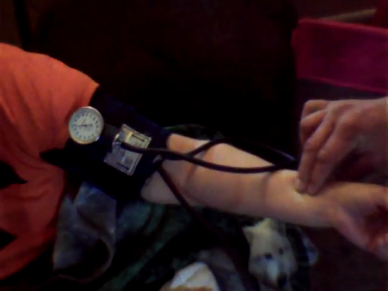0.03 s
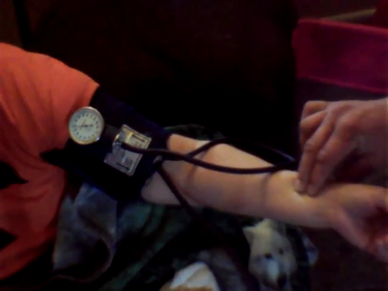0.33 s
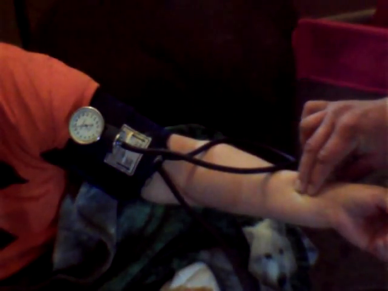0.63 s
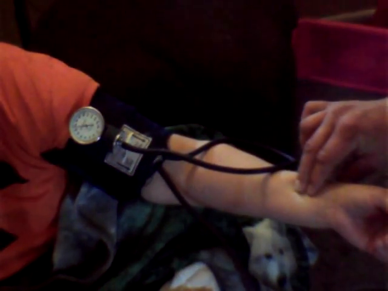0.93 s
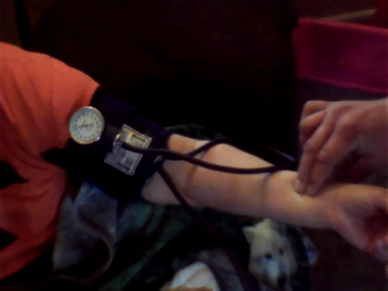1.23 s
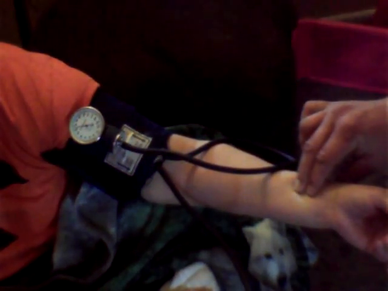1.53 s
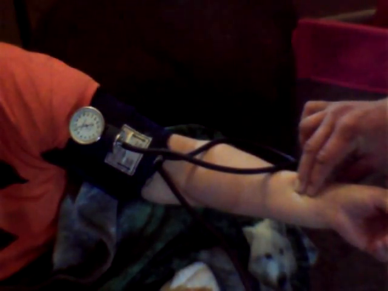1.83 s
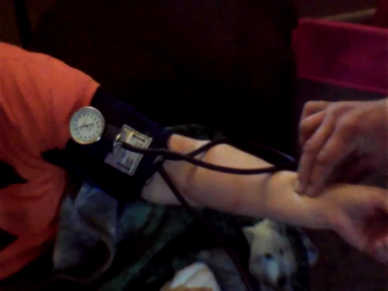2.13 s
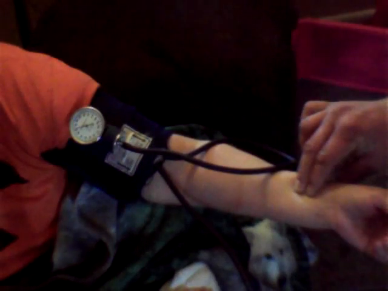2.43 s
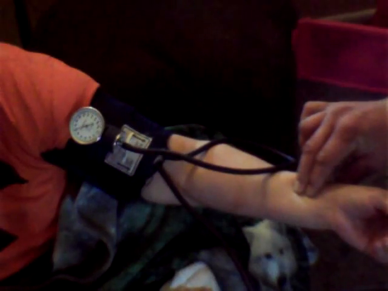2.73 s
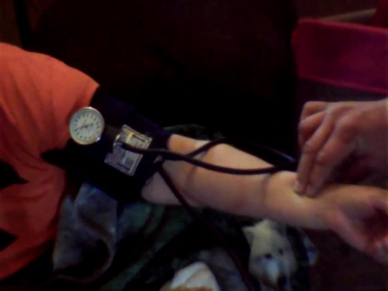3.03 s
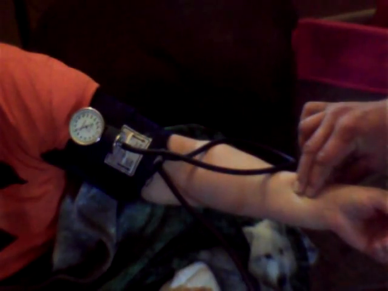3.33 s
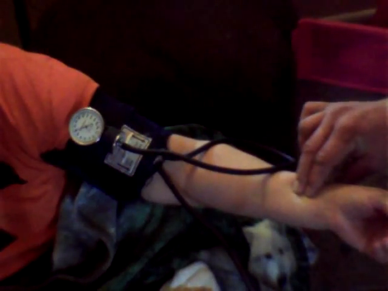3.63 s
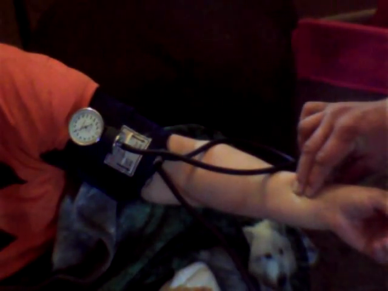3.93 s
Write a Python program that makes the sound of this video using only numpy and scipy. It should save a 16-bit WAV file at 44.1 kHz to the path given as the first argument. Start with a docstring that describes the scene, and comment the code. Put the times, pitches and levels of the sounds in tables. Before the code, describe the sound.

A loud electrical buzz runs without change, carrying a thin, high, fluttering whine. Steady hiss and a faint low hum lie underneath. It is interference inside a small camera, with no sound from the room itself.

```python
"""A still room, with nothing at the microphone: all that is heard arises in a small camera's sound circuit.
A load switches on and off about 58 times a second, and each switching edge ticks, making a buzz.
While the load is on, a thin whine and extra hiss get through.
Mains hum and steady amplifier hiss lie underneath."""
import sys
import numpy as np
from scipy import signal
from scipy.fft import rfft, irfft
from scipy.io import wavfile

SR = 44100
rng = np.random.default_rng(int(sys.argv[2]) if len(sys.argv) > 2 else 0)


def unload_wav(signal):
    """Save mono or channel-first audio to the path in sys.argv[1] as 16-bit WAV at rate SR, clipped to [-1, 1]."""
    wavfile.write(
        sys.argv[1],
        SR,
        np.round(np.clip(np.atleast_2d(signal).T, -1, 1) * 32767).astype(np.int16),
    )


N = 176400

CYCLE_HZ, FIRST_ON_S, ON_S = 57.555, .0155, .0109   # the load: rate, first switch-on, time on


def switching_buzz(cycle, since_on):
    """Each switching edge ticks: a sharp spike and a rounded recoil, their polarity flipping every cycle."""
    # Each row: ms after switch-on, spike height, nominal spike width in ms, relative recoil height.
    edges = [(0, -.046, .075, .029), (10.92, .092, .058, -.028), (14.04, -.102, .08, .057)]
    jitter_ms, scatter_db = .013, 1
    recoil_ms, recoil_db = .44, -1.5
    ticks = np.zeros(N)
    for at_ms, spike, width_ms, recoil in edges:
        late, spike_draw, recoil_draw = rng.standard_normal((cycle[-1] + 1, 3))[cycle].T
        ms = since_on * 1000 - at_ms + jitter_ms * late
        pulse = np.exp(-.5 * (ms / (.94 * width_ms)) ** 2)
        ticks += spike * from_db(scatter_db * spike_draw) * pulse
        age = np.maximum(ms, 0) / recoil_ms
        swing_back = (age * np.exp(1 - age)) ** 2.9
        ticks += recoil * from_db(recoil_db + scatter_db * recoil_draw) * swing_back
    return ticks * (-1) ** cycle


def whine(cycle, since_on):
    """A high tone restarts with every burst; the converter mirrors it and folds its overtones down."""
    whine_hz, converter_hz = 7320, 16000
    whine_db, image_db = -25.5, (-24.5, -49, -48.5)   # images of harmonics 1, 2 and 3
    # Every other burst starts a little short of opposite phase.
    start_turns = .38 * (cycle % 2) + .027 * rng.standard_normal(cycle[-1] + 1)[cycle]
    phase = 2 * np.pi * (whine_hz * since_on + start_turns)
    clock = 2 * np.pi * converter_hz * np.arange(N) / SR
    images = sum(from_db(db) * np.sin(clock - k * phase) for k, db in enumerate(image_db, 1))
    return np.sqrt(2) * (from_db(whine_db) * np.sin(phase) + images)


def load_bursts(cycle, since_on):
    """Whine and extra hiss get through only while the load is on."""
    # Each row: frequency in Hz, hiss density in dB per Hz ahead of the converter.
    burst_hiss = [(30, -88), (500, -80), (2000, -79), (5000, -80), (8000, -78.5)]
    ramp_s = .0001
    load_on = np.clip(np.minimum(since_on, ON_S - since_on) / ramp_s + .5, 0, 1)
    return load_on * (whine(cycle, since_on) + shaped_noise(burst_hiss))


def mains_hum():
    """Odd multiples of the mains, which beat slowly against the buzz."""
    # Each entry: a multiple of the mains frequency.
    orders = (1, 5, 9, 13, 15, 21, 25)
    # Each entry: the level of that multiple in dB.
    levels_db = [-58, -59.5, -51.5, -57, -60, -57.5, -71.5]
    mains_hz = 60
    t = np.arange(N) / SR
    return np.sqrt(2) * sum(from_db(db) * np.sin(2 * np.pi * (k * mains_hz * t + rng.random()))
                            for k, db in zip(orders, levels_db))


def amplifier_hiss():
    """The amplifier's steady noise floor."""
    # Each row: frequency in Hz, density in dB per Hz ahead of the converter.
    noise_floor = [(30, -76), (120, -80), (300, -76.5), (550, -76), (1000, -77.5), (2000, -80.5),
                   (4000, -80.5), (8000, -82)]
    return shaped_noise(noise_floor)


def load_cycles(lead_s):
    """Each sample's cycle number and seconds since switch-on; a cycle opens lead_s before switch-on."""
    t = np.arange(N) / SR - FIRST_ON_S + 2 / CYCLE_HZ
    cycle = np.floor((t + lead_s) * CYCLE_HZ).astype(int)
    return cycle, t - cycle / CYCLE_HZ


def shaped_noise(spectrum):
    """Steady noise whose density follows the given points of Hz and dB per Hz."""
    hz, db = np.transpose(spectrum)
    density_db = np.interp(np.log(np.fft.rfftfreq(N, 1 / SR) + 1), np.log(hz), db)
    return irfft(rfft(rng.standard_normal(N)) * from_db(density_db), N) * np.sqrt(SR / 2)


def from_db(db):
    """Decibels to gain."""
    return 10 ** (np.asarray(db) / 20)


def scene():
    """Buzz and bursts in front, hum and hiss behind, in mono."""
    cycle, since_on = load_cycles(lead_s=.0006)   # the lead keeps the switch-on tick whole
    bursts = load_bursts(cycle, since_on)
    return (switching_buzz(cycle, since_on) + bursts + mains_hum() + amplifier_hiss())[None]


def record(dry):
    """The camera's converter rolls the treble off, cuts the top and rests off zero."""
    rolloff_hz, cutoff_hz, dc_offset = 8040, 9975, -.311
    smooth = signal.sosfiltfilt(signal.butter(6, rolloff_hz, fs=SR, output="sos"), dry)
    return signal.sosfilt(signal.butter(12, cutoff_hz, fs=SR, output="sos"), smooth) + dc_offset


dry = scene()
out = record(dry)
unload_wav(out)
```